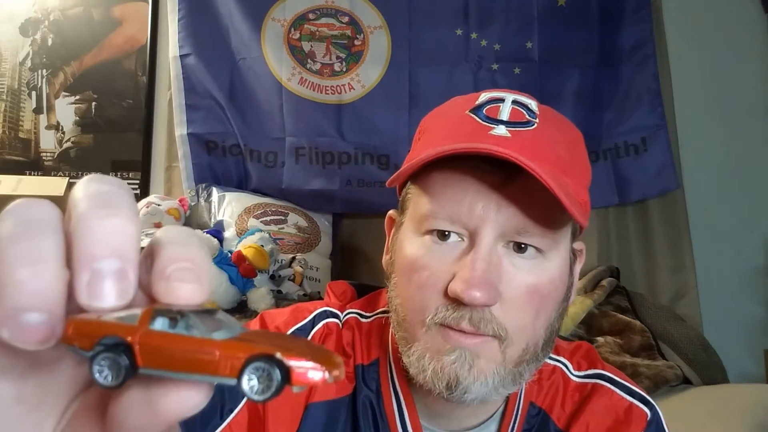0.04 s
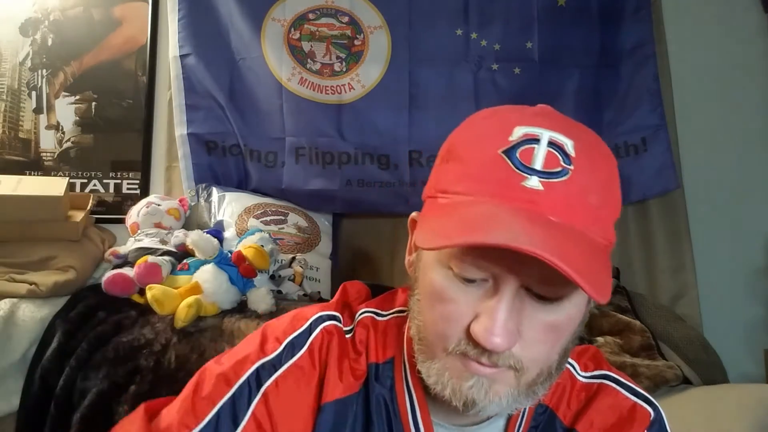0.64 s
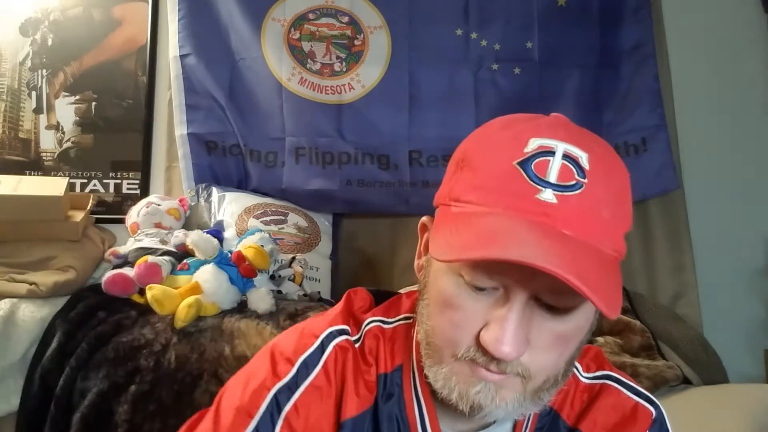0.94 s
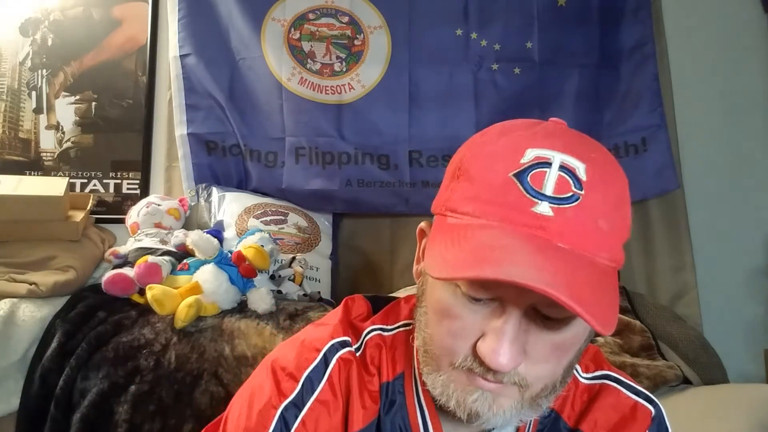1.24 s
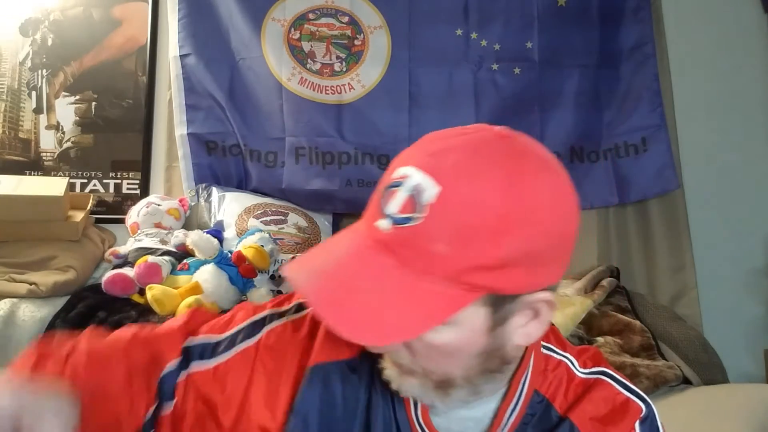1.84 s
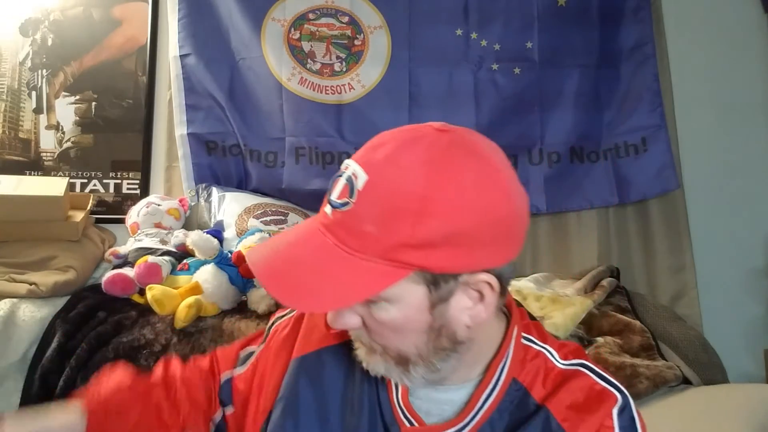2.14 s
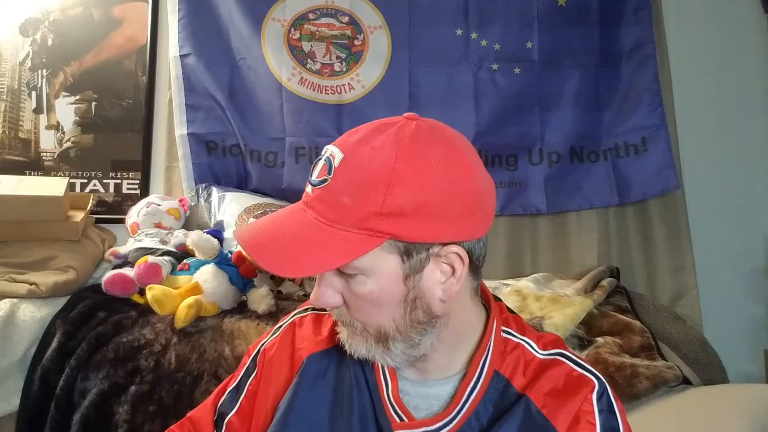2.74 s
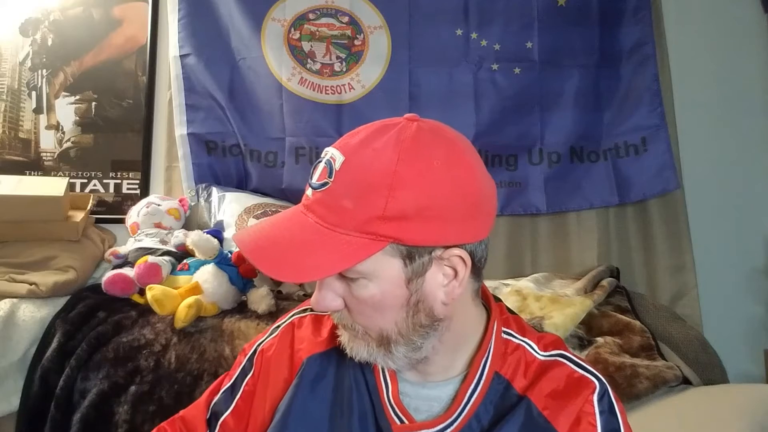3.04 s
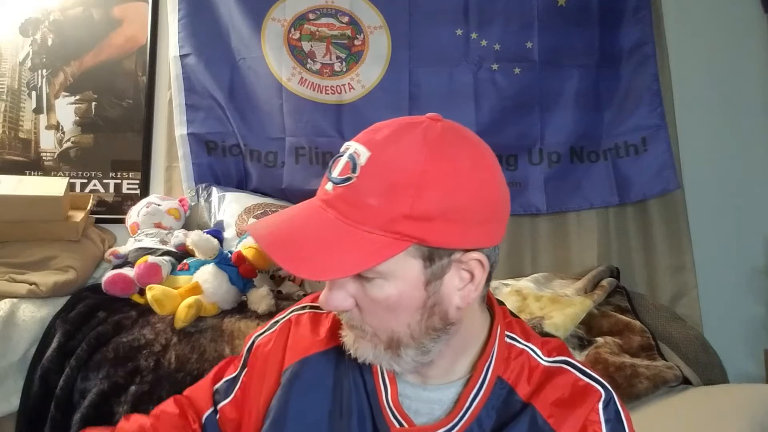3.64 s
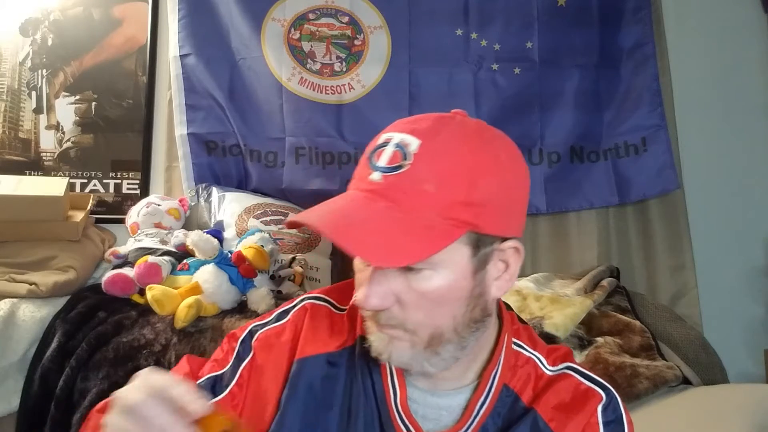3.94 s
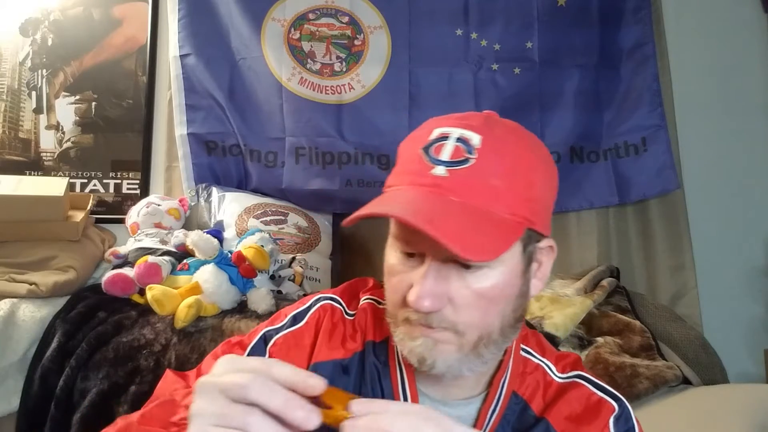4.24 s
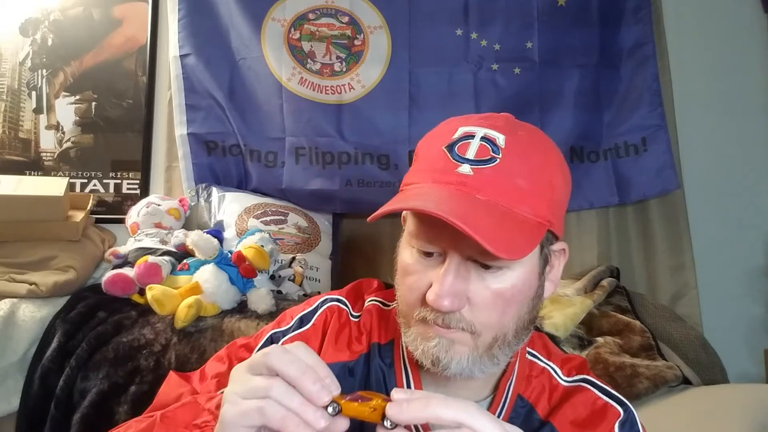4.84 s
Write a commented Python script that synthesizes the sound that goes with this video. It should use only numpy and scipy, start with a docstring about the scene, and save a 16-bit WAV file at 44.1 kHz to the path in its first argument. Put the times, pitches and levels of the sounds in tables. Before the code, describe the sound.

Someone handles small metal toy cars at a desk, heard up close over faint room noise and hum. After soft ticks comes a loud knock with a short low boom, then a car drops and bounces lightly. A sleeve swishes as the arm reaches aside, and cars clink against each other and drag briefly along a shelf. A few tiny wheel ticks close the scene.

```python
"""Die-cast toy cars at a desk in a small furnished room, close to a two-port microphone.
Over room noise and hum, a satin sleeve rustles and loose wheels tick. At 1.1 s a hard knock rings
the desk; a low boom follows. At 1.4 s a car lands and bounces, each bounce sooner, weaker, duller.
The arm reaches aside; from 2.6 s cars click together and drag on a shelf, with light desk knocks.
From 4.2 s one car is turned in the hand and its wheels tick against their axles."""
import sys
import numpy as np
from scipy import signal
from scipy.fft import rfft, irfft
from scipy.io import wavfile

SR = 44100
rng = np.random.default_rng(int(sys.argv[2]) if len(sys.argv) > 2 else 0)


def store_pcm(level_fs):
    """Save levels as 16-bit WAV."""
    pcm = np.round(np.clip(level_fs, -1, 1) * 32767).astype(np.int16)
    wavfile.write(sys.argv[1], SR, np.atleast_2d(pcm).T)


N = 220759
RING_S = 0.25  # length of every ring and room tail

# room noise and microphone hiss: f/Hz, level/dB
AIR_SPECTRUM = [(15, -55), (25, -13.5), (96, -9.5), (169, -3.5), (204, -11), (399, -9.5), (445, -12),
                (582, -14), (1110, -23.5), (2300, -25), (7700, -38), (15500, -30.5)]
# treble shading of the left port: f/Hz, gain/dB
LEFT_SHADE = [(100, -1.5), (1000, -2.5), (4000, 1.5), (6500, -3), (9500, -6.5), (15000, -24)]
# slipping satin threads: f/Hz, level/dB
SATIN_SPECTRUM = [(100, -10), (170, -1), (350, -6), (600, -5), (1050, -4), (2100, -10), (3700, -7.5),
                  (6000, -12), (9500, -22), (15500, -13.5)]
# snapping creases: f/Hz, level/dB
CREASE_SPECTRUM = [(150, -15), (400, -4), (800, 1), (1300, -3), (2000, -4), (4000, -12.5), (9000, -32)]
# arm strokes: t of top speed/s, rise/s, fall/s, level/dB, brightness
ARM_STROKES = [(.47, 0.11, 0.69, -71.5, -.3), (.7, .02, 0.022, -62, 0.8), (1.09, 0.21, 0.45, -62, -0.3),
               (1.55, 0.075, 0.069, -55.5, -0.5), (1.839, 0.097, 0.11, -57.5, 0.8),
               (2.08, 0.13, 0.22, -66.5, 0.1), (2.38, 0.067, 0.13, -59, -0.86),
               (3.02, 0.13, 0.16, -57, -0.1), (3.42, 0.06, 0.071, -61.5, 0), (3.52, 0.014, 0.092, -53, 0),
               (3.64, 0.091, 0.21, -56.5, 0.5)]
# contact tick: f/Hz, level/dB
TICK_SPECTRUM = [(2500, -19), (4000, -7.5), (6300, -1.5), (8200, -2.5), (9500, -9.5), (11000, -2.5),
                 (13000, -4.5), (15000, 2.5)]
# crowded, damped modes of plastic base and wheels: f/Hz, level/dB
CLACK_SPECTRUM = [(60, -18), (200, 9.5), (700, -10.5), (1400, -7), (2200, -3), (3000, 5.5), (4200, 2),
                  (6200, -5.5), (8500, -1.5), (11000, -22), (15000, -38.5)]
# loose wheels: t/s, level/dB, ring f/Hz, ring/dB, tick/dB
WHEEL_TICKS = [(0.493, -56, 2750, -6.5, -4), (0.6546, -48.5, 4400, -11, -12), (0.689, -50, 4300, -7, -6),
               (1.268, -50, 5070, -1, 0), (1.743, -54.5, 3030, -4, -15), (4.173, -51, 2970, -9, -6.5),
               (4.29, -57.5, 2970, -7, -3.5), (4.518, -48, 3270, -6, -15), (4.5458, -52.5, 2890, 6, -5),
               (4.8238, -53, 3930, -2, 1.5), (4.9202, -54.5, 3580, -7, 10.5), (4.9243, -57.5, 3020, 2, 7)]
# shelf: f/Hz, level/dB, t60/s
SHELF_MODES = [(117, -12.5, 0.084), (161, -9, 0.083), (342.4, 0, 0.054), (392, -28, 0.015),
               (590, -11, 0.036), (765, -2, 0.041), (1044, -8, 0.028), (1715, -14, 0.071),
               (2140, -15, 0.012)]
# cars shoved along the shelf: t/s, hold/s, level/dB
SHELF_DRAGS = [(2.902, 0.25, -52), (3.186, .015, -54.5), (3.51, .015, -52), (3.613, 0.033, -51)]
# cast body: ratio to ring f, level/dB, t60/s
SHELL_MODES = [(.68, -19, 0.1), (.755, -7.5, 0.025), (0.951, -0.5, 0.075), (1.075, 0, 0.021),
               (1.18, -10.5, 0.063), (1.36, -2.5, .03), (1.563, -2.5, 0.023), (1.94, -17, 0.022)]
# car against car: t/s, level/dB, ring f/Hz, shelf thud/dB, tick/dB
CAR_CLICKS = [(2.623, -44.5, 4010, -8, 0), (2.6274, -47, 3460, -1, -8), (2.6851, -47, 2760, 2, 0),
              (2.822, -36, 2916, -7.5, -5), (2.921, -45, 3940, -18, 3.5), (3.009, -44, 4030, -8, -13),
              (3.0919, -33.5, 3985, -13.5, -4), (3.105, -37.5, 4000, -8.5, -2),
              (3.186, -36, 3820, -30, -13), (3.189, -33.5, 3980, -21, -6), (3.1957, -36, 4170, -8.5, -0.5),
              (3.1988, -28.5, 3936, -29, -8), (3.208, -46.5, 3950, 0.5, -6),
              (3.2403, -41.5, 3960, -35, 2.5), (3.379, -52, 3830, -3, 8.5), (3.421, -48, 3750, -9, -17),
              (3.4841, -47.5, 3420, -4, 1), (3.5243, -47.5, 3880, -5, 13)]
# landing car and the desk under it: f/Hz, level/dB, t60/s
LANDING_MODES = [(103, -6.5, 0.087), (152, -9.5, 0.088), (184, -7.5, 0.12), (293.5, -0.5, 0.059),
                 (1070, -7.5, 0.072), (1452, -4.5, 0.038), (2183, 1, 0.014), (2780, 3.5, 0.017),
                 (3070, 0, 0.011), (3280, -19, 0.015), (4260, -16, 0.017), (4950, -18, 0.016),
                 (8600, -21, .015)]
# desk top: f/Hz, level/dB, t60/s
DESK_MODES = [(127, -25.5, 0.075), (300, -6, .025), (407, -12, 0.058), (607, 3, 0.017), (770, 2.5, 0.024),
              (1070, -10, 0.047), (1200, -11, 0.036), (1401, -10.5, 0.063), (1530, -17.5, 0.087),
              (1640, -13, 0.034), (1775, -14, 0.034), (2068, -13, 0.016), (2380, -23.5, 0.039),
              (2705, -26.5, 0.026)]
# blows on the desk: t/s, level/dB, tilt/(dB/oct)
DESK_KNOCKS = [(0.6885, -42.5, 1.5), (1.1338, -13, 3), (1.276, -62, -13), (1.2941, -37.5, -4),
               (1.371, -53, -7), (1.741, -51.5, 5.5), (2.6851, -45, -1), (3.516, -42, 0.5),
               (3.547, -55, 11), (3.68, -52, -5.5), (3.732, -48.5, -5)]


def amp(db):
    """Decibels to gain."""
    return 10 ** (np.asarray(db) / 20)


def unit(x):
    """Scale to rms 1."""
    return x / np.sqrt(np.mean(x ** 2))


def fade(t60_s):
    """Exponential decay, RING_S long."""
    return np.exp(-np.log(1000) * np.arange(int(RING_S * SR)) / SR / t60_s)


def swell(at_s, rise_s, hold_s, fall_s):
    """Gain that reaches 1 at at_s, holds, dies; rise and fall are time constants."""
    t = np.arange(N) / SR - at_s
    return np.exp(np.minimum(t, 0) / rise_s - np.maximum(t - hold_s, 0) / fall_s)


def convolve(x, response):
    """Convolution cut to the input length."""
    return signal.fftconvolve(x, response)[:len(x)]


def butter(x, order, hz, kind="low"):
    """Causal Butterworth filter."""
    return signal.sosfilt(signal.butter(order, hz, kind, fs=SR, output="sos"), x)


def colour(x, points, size=4096):
    """Minimum-phase filter through (f/Hz, gain/dB) points."""
    hz, db = np.transpose(points)
    bins_hz = np.maximum(np.fft.rfftfreq(size, 1 / SR), 1)
    gain = amp(np.interp(np.log(bins_hz), np.log(hz), db))
    cepstrum = irfft(np.log(gain))
    cepstrum[1:size // 2] *= 2
    cepstrum[size // 2 + 1:] = 0
    return convolve(x, irfft(np.exp(rfft(cepstrum))))


def add(track, at_s, sound):
    """Mix a two-port sound into a track."""
    start = int(at_s * SR)
    track[:, start:start + sound.shape[1]] += sound[:, :N - start]


def grains(per_s, spread_db):
    """Tiny blows at random times, most weak, a few strong; rms 1."""
    impulses = (rng.random(N) < per_s / SR) * rng.choice([-1, 1], N)
    return unit(impulses * amp(spread_db * np.minimum(rng.exponential(size=N), 3)))


def ring(modes, tilt_db_oct=0, scatter_db=0, apart_hz=2400):
    """Struck modes of alternating sign; short waves reach the two ports out of step."""
    t = np.arange(int(RING_S * SR)) / SR
    out = 0
    for k, (hz, db, t60_s) in enumerate(modes):
        gain = amp(db + tilt_db_oct * np.log2(hz / 1000) + scatter_db * rng.standard_normal())
        skew_rad = min(hz / apart_hz, 1) * np.cos(k) * np.array([[1], [-1]])
        out = out + (-1) ** k * gain * np.sin(2 * np.pi * hz * t + skew_rad) * fade(t60_s)
    return out


def crack(spectrum, t60_s):
    """Countless short modes as a noise burst, different at each port."""
    decay = fade(t60_s)
    return np.array([unit(colour(noise, spectrum)) * decay
                     for noise in rng.standard_normal((2, len(decay)))])


def room(x, wet_db, t60_s=0.2, treble_t60_s=0.15, split_hz=3000, shared_hz=600,
         build_s=0.002, left_lag_s=0.0001):
    """Direct sound reaches the right port first; walls and desk add a short diffuse tail."""
    t = np.arange(N) / SR
    left, right = np.broadcast_to(x, (2, N))
    direct = np.array([np.interp(t - left_lag_s, t, left), right])
    noise = rng.standard_normal((3, int(RING_S * SR)))
    shared_bass = butter(noise[2], 2, shared_hz)
    field = shared_bass + butter(noise[:2], 2, shared_hz, "high")
    low = butter(field, 1, split_hz)
    onset = 1 - fade(np.log(1000) * build_s)
    tails = (low * fade(t60_s) + (field - low) * fade(treble_t60_s)) * onset
    wet = [convolve(port, tail / np.linalg.norm(tail)) for port, tail in zip((left, right), tails)]
    return direct + amp(wet_db) * np.array(wet)


def air(noise_db=-65, hum_hz=62.2, hum_db=-79):
    """Quiet room noise, microphone hiss and faint mains hum."""
    mid, side = (colour(rng.standard_normal(N), AIR_SPECTRUM) for _ in range(2))
    side = colour(side, [(60, 0), (150, -6.5), (400, -4), (1000, 2.0), (3000, -0.5)])
    noise = np.array([mid + side, mid - side]) / np.std(mid)
    hum = np.sqrt(2) * np.sin(2 * np.pi * hum_hz * np.arange(N) / SR)
    return amp(noise_db) * noise + amp(hum_db) * hum


def arm(stir_db=-80, stir_brightness=-0.5):
    """Sleeve level/dB and brightness: strokes and a steady stir, weighted by power."""
    moves = [(amp(db) * swell(at_s, rise_s, 0, fall_s), brightness)
             for at_s, rise_s, fall_s, db, brightness in ARM_STROKES]
    moves.append((amp(stir_db), stir_brightness))
    power = sum(gain ** 2 for gain, _ in moves)
    return 10 * np.log10(power), sum(gain ** 2 * brightness for gain, brightness in moves) / power


def sleeve(crease_db=-8, flutter_db=2, flutter_per_s=60, split_hz=2000, around_db=-2, around_hz=1200):
    """Satin threads slip in dense grains and creases snap; the rustle flutters."""
    level_db, brightness = arm()
    hiss = unit(colour(grains(per_s=6000, spread_db=3.5), SATIN_SPECTRUM))
    # wide, moving cloth: each port also hears its own treble
    around = np.array([unit(colour(grains(per_s=6000, spread_db=2.5), SATIN_SPECTRUM))
                       for _ in range(2)])
    hiss = hiss + amp(around_db) * butter(around, 1, around_hz, "high")
    creases = unit(colour(grains(per_s=90, spread_db=0.5), CREASE_SPECTRUM))
    low = butter(hiss, 1, split_hz)
    flutter = np.interp(np.arange(N) / SR * flutter_per_s, np.arange(N), rng.standard_normal(N))
    cloth = low * amp(-2 * brightness) + (hiss - low) * amp(2 * brightness) + amp(crease_db) * creases
    return room(cloth * amp(level_db + flutter_db * flutter), wet_db=-6) * amp(3)


def wheels(ring_t60_s=0.023, clack_db=-3, rebound_db=-7, rebound_s=(0.0014, 0.024)):
    """A wheel drops against its axle and rebounds once; fingers damp the body."""
    out = np.zeros((2, N))
    for at_s, db, hz, ring_db, tick_db in WHEEL_TICKS:
        edge = amp(clack_db) * crack(CLACK_SPECTRUM, 0.015) + amp(tick_db) * crack(TICK_SPECTRUM, 0.024)
        add(out, at_s, amp(db) * (ring([(hz, ring_db, ring_t60_s)]) + edge))
        add(out, at_s + rng.uniform(*rebound_s), amp(db + rebound_db) * edge)
    return room(out, wet_db=-3)


def drag(rise_s=0.022, fall_s=0.041, ring_hz=3960, clack_db=-4, shelf_db=-8):
    """Wheels catch and slip: a dense run of tiny uneven blows on body and shelf."""
    push = sum(amp(db) * swell(at_s, rise_s, hold_s, fall_s) for at_s, hold_s, db in SHELF_DRAGS)
    blows = grains(per_s=420, spread_db=4) * push
    edge = amp(clack_db) * crack(CLACK_SPECTRUM, 0.037) + crack(TICK_SPECTRUM, 0.058)
    response = ring([(ring_hz, -6, 0.03)]) + amp(shelf_db) * ring(SHELF_MODES) + edge
    ports = [convolve(blows, port / np.linalg.norm(port)) for port in response]
    return room(np.array(ports), wet_db=-5.5) * amp(-1.5)


def clicks(ring_db=-7, ring_t60_s=0.036, shell_db=-10, clack_db=-10,
           rebound_db=-8, rebound_s=(0.0027, 0.018)):
    """Metal meets metal: the body rings, the shelf thuds, loose axles rebound twice."""
    out = np.zeros((2, N))
    for at_s, db, hz, thud_db, tick_db in CAR_CLICKS:
        modes = [(ratio * hz, mode_db, t60_s) for ratio, mode_db, t60_s in SHELL_MODES]
        shell = ring(modes, scatter_db=3.5)
        body = ring([(hz, ring_db, ring_t60_s)]) + amp(shell_db) * shell
        tick = amp(tick_db + 4) * crack(TICK_SPECTRUM, 0.013)
        edge = tick + amp(clack_db) * crack(CLACK_SPECTRUM, 0.032)
        thud = amp(thud_db - 1) * ring(SHELF_MODES, scatter_db=2)
        add(out, at_s, amp(db) * (body + edge + thud))
        for delay_s in rng.uniform(*rebound_s, size=2):
            add(out, at_s + delay_s, amp(db + rebound_db) * edge)
    return room(out, wet_db=-2.4)


def landing(at_s=1.4381, first_db=-35.5, first_flight_s=0.049, restitution=0.67, contacts=5,
            loss_db=7.5, first_tilt_db_oct=0.67, dulling_db_oct=1.5, wheel_lead_s=0.0024, wheel_db=-1.5):
    """A car lands wheels first; each bounce rings car and desk and keeps a share of the speed."""
    out = np.zeros((2, N))
    for k in range(contacts):
        db = first_db - loss_db * k
        tilt_db_oct = first_tilt_db_oct - dulling_db_oct * k
        tick_gain, clack_gain = amp(-12 + 3 * tilt_db_oct), amp(-2 + tilt_db_oct)
        wheel, edge = (tick_gain * crack(TICK_SPECTRUM, 0.023) + clack_gain * crack(CLACK_SPECTRUM, 0.02)
                       for _ in range(2))
        add(out, at_s, amp(db) * (ring(LANDING_MODES, tilt_db_oct, scatter_db=1) + edge))
        if k == 0:
            add(out, at_s - wheel_lead_s, amp(db + wheel_db) * wheel)
        at_s += first_flight_s * restitution ** k
    return room(out, wet_db=-3.5)


def boom(at_s=1.165, db=-37.5, from_hz=312, to_hz=148.8, sink_after_s=0.023, sink_s=0.012, third_db=-17):
    """Low tone after the hard knock, with a weak third partial; swells, then sinks in pitch."""
    t = np.arange(N) / SR - at_s
    sunk = (1 + np.tanh((t - sink_after_s) / (2 * sink_s))) / 2
    hz = from_hz + (to_hz - from_hz) * sunk
    phase = 2 * np.pi * np.cumsum(hz) / SR
    phase -= phase[int(at_s * SR)]
    gain = amp(db) * swell(at_s, rise_s=0.0075, hold_s=0.031, fall_s=0.018)
    return room(gain * (np.sin(phase) + amp(third_db) * np.sin(3 * phase)), wet_db=-9)


def knocks(contact_band_hz=(60, 2300), tick_db=-44, clack_db=-35):
    """Blunt blows ring the desk top; the soft contact leaves little above its highest modes."""
    out = np.zeros((2, N))
    for at_s, db, tilt_db_oct in DESK_KNOCKS:
        body = butter(ring(DESK_MODES, tilt_db_oct, apart_hz=2380), 4, contact_band_hz, "band")
        edge = amp(tick_db) * crack(TICK_SPECTRUM, 0.015) + amp(clack_db) * crack(CLACK_SPECTRUM, 0.013)
        add(out, at_s, amp(db) * (body + amp(2 * tilt_db_oct) * edge))
    return room(out, wet_db=-5.5)


def scene():
    """All handling, shaded at the left port, over the quiet room."""
    left, right = knocks() + boom() + landing() + clicks() + drag() + wheels() + sleeve()
    return np.array([colour(left, LEFT_SHADE), right]) + air()


def record(dry, ceiling=0.89, top_hz=15800):
    """Recorder: soft clip, then steep low-pass."""
    rounded = ceiling * np.tanh(dry / ceiling)
    return signal.sosfilt(signal.ellip(10, 0.2, 70, top_hz, fs=SR, output="sos"), rounded)


dry = scene()
out = record(dry)
store_pcm(out)
```